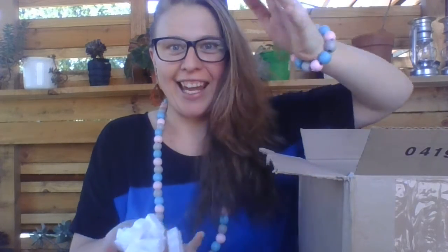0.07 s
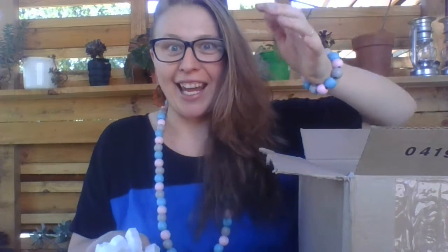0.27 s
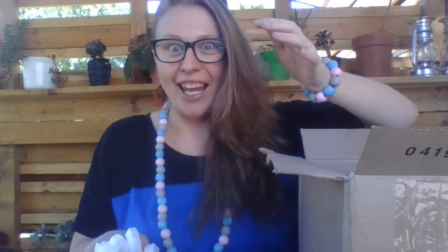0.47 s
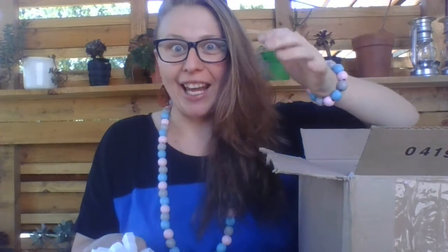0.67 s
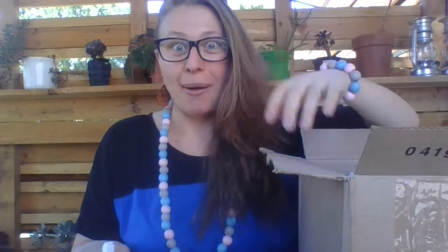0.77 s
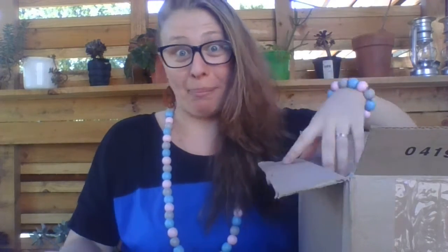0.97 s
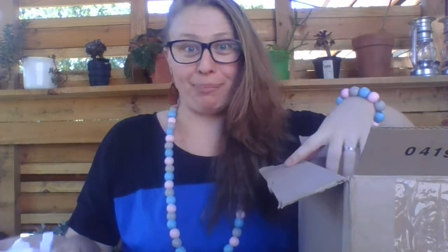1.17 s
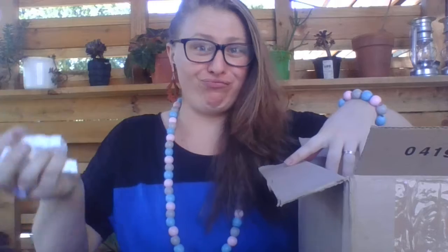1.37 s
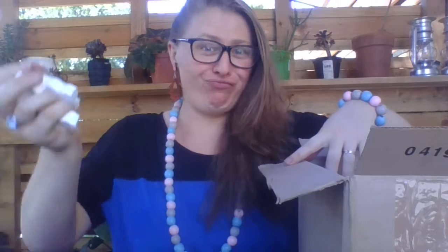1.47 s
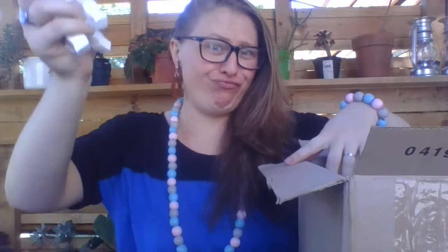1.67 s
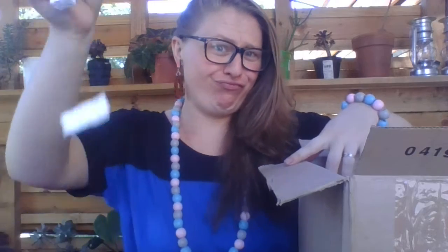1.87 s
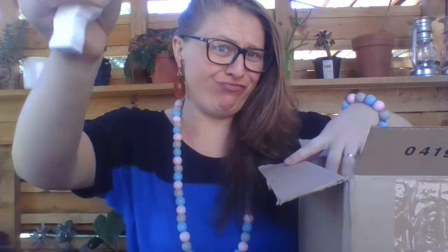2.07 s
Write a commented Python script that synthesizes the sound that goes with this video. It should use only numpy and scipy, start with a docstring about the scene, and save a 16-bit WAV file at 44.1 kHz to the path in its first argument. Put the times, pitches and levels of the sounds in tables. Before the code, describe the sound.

A hard, high-pitched tick of foam chips hitting a tabletop, pinging and skidding to rest, a faint brush on cardboard, then crisp snaps and rubbing of squeezed chips, recorded close on a quiet outdoor porch with short reflections.

```python
"""On a small wooden porch, foam packing chips drop onto a table close by, ping and bounce to rest.
Each landing is two noise puffs plus damped sines; noise grains make the skidding between bounces.
A hand bumps a cardboard box (booms, puffs, grains). Then a handful of chips is squeezed and lifted:
grains rub, short puffs snap and stick-slip pulses squeak. Below and behind lie a low rumble, quiet air,
a thin far twitter of swept narrow noise and, near the end, a faint steady tone."""
import sys
import numpy as np
from scipy import signal
from scipy.fft import rfft, irfft
from scipy.io import wavfile
from scipy.ndimage import uniform_filter1d

SR = 44100
rng = np.random.default_rng(int(sys.argv[2]) if len(sys.argv) > 2 else 0)


def log_audio(samples):
    """Write samples as a 16-bit WAV file to the path given in sys.argv[1]."""
    # one column per channel
    frames = np.atleast_2d(samples).T
    # limit to full scale, then quantise
    limited = np.clip(frames, -1, 1)
    pcm = np.round(limited * 32767).astype(np.int16)
    wavfile.write(sys.argv[1], SR, pcm)


N = 93492
T = np.arange(N) / SR  # time [s]
RING_N = SR // 5  # longest ring [samples]


def amp(db):
    """Decibels to gain."""
    return 10 ** (np.asarray(db) / 20)


def unit(x):
    """Scales to rms 1."""
    return x / np.sqrt(np.mean(x ** 2) + 1e-20)


def add(mix, s, sound):
    """Mixes a sound in at time s, cut off where the mix ends."""
    part = mix[max(round(s * SR), 0):][:len(sound)]
    part += sound[:len(part)]


def level(points):
    """Gain over time from (time [s], level [dB]) points."""
    return amp(np.interp(T, *np.transpose(points)))


def colour(x, points, size=8192):
    """Minimum-phase filter through (frequency [Hz], relative level [dB]); keeps the power of white noise."""
    hz, db = np.transpose(points)
    bins_hz = abs(np.fft.fftfreq(size, 1 / SR)) + 1
    gain = unit(amp(np.interp(np.log(bins_hz), np.log(hz), db)))
    spectrum = np.exp(np.conj(signal.hilbert(np.log(gain))))
    taps = np.fft.ifft(spectrum).real[:size // 2]
    return signal.fftconvolve(x, taps)[:len(x)]


def burst(decay_s, size=4096):
    """A dying puff of noise: its spectrum is flattened, then its end is faded further."""
    fall = np.exp(-np.minimum(T[:size] / decay_s, 20))
    z = rfft(rng.standard_normal(size) * fall)
    flat = irfft(z / (abs(z) + 1e-12), size)
    return unit(flat * np.sqrt(np.sqrt(fall))) * np.sqrt(np.mean(fall ** 2))


def puffs(rows, spectrum):
    """Short dying bursts that share one colour."""
    out = np.zeros(N)
    for s, db, decay_s in rows:
        add(out, s, amp(db) * burst(decay_s))
    return colour(out, spectrum)


def ring(modes, scale=1, blur=0):
    """Damped sines of a struck object; blur lets the strength and phase of each one wander."""
    blur_s = 0.0016  # how fast the wander changes
    t, out = T[:RING_N], 0
    for hz, db, t60 in modes:
        phase = 2 * np.pi * hz * scale * t
        wave = np.sin(phase)
        if blur:
            smoother = np.poly([np.exp(-1 / (blur_s * SR))] * 2)
            noise = rng.standard_normal((2, len(t)))
            strength, shift = unit(signal.lfilter([1], smoother, noise))
            wave = (1 + blur * strength) * np.sin(phase + blur * shift)
        out = out + amp(db) * np.exp(-np.log(1000) * t / t60) * wave
    return out


def resonate(x, hz, width_hz):
    """A steep resonance of gain 1 that follows hz: shift down, low-pass twice, shift back."""
    turn = np.exp(2j * np.pi * np.cumsum(hz * np.ones(len(x))) / SR)
    r = np.exp(-np.pi * width_hz / SR)
    low = signal.lfilter([(1 - r) ** 2], [1, -2 * r, r * r], x / turn)
    return 2 * (turn * low).real


def rubbing(curve, spectrum, spread_db):
    """Dense tiny slips of uneven size, evened out and then shaped by the level curve."""
    grains_per_s, grain_s = 2600, 0.0005  # average rate, decay
    sizes = amp(spread_db * np.minimum(rng.exponential(1, N), 4))
    slips = (rng.random(N) < grains_per_s / SR) * sizes
    envelope = signal.lfilter([1], [1, -np.exp(-1 / (grain_s * SR))], slips)
    grains = envelope * rng.standard_normal(N)
    running_rms = np.sqrt(abs(uniform_filter1d(grains ** 2, size=700)) + 1e-9)
    return colour(grains / running_rms * level(curve), spectrum)


def landings():
    """Each landing knocks, ticks and rings in its own mix; the table top rings with the knock."""
    # chips landing: (time [s], knock [dB], tick [dB], low ring pitch [Hz],
    # low ring [dB], middle ring [dB], high ring [dB])
    falls = [(.3107, -36.5, -26.5, 3300, -57, -29.5, -46), (.3167, -21.5, -32.5, 3195, -25.5, -2.5, -25),
             (.4499, -39, -29, 3400, -37, -21.5, -22.5), (.5121, -36, -39, 3455, -29.5, -30, -22.5),
             (.5358, -37.5, -38, 3580, -42, -22.5, -34.5), (.5565, -42, -63, 3455, -40.5, -48, -45),
             (.6103, -36, -58, 3260, -42.5, -46, -46.5), (.6250, -54.5, -65, 3260, -48, -62.5, -51),
             (.6452, -47, -55, 3300, -51.5, -62, -51.5), (.6920, -51.5, -63, 3480, -65, -48, -53),
             (.6985, -53.5, -66, 3440, -60.5, -41, -47), (.7268, -51.5, -66, 3348, -50.5, -49, -47.5),
             (.7362, -53, -62.5, 3350, -62, -62, -67), (.7590, -53, -73, 3350, -69, -61.5, -67),
             (.7735, -64, -76, 3385, -63, -70, -74), (.8185, -68.5, -60, 3350, -80, -66, -68),
             (.8255, -71, -63, 3350, -89, -62, -75)]
    # modes of a chip's low ring: (pitch ratio, level [dB], t60 [s])
    low_modes = [(1.0, 0, .065), (1.13, -6, .035), (.81, -8, .02), (1.205, -13, .065)]
    # modes of a chip's middle ring, high ring and of the table top: (frequency [Hz], level [dB], t60 [s])
    mid_modes = [(6067, 2, 0.011), (6430, -26.5, 0.0553), (5540, -12, 0.0081)]
    high_modes = [(7060, -2, 0.023), (7290, -5, .03), (8060, -12, .028)]
    top_modes = [(183, -28.5, 0.094), (206, -23, 0.035), (282, -30, 0.044), (468.7, -28, 0.12),
                 (678, -22, .06), (828, -19.5, 0.086), (970, -29, 0.12), (1427, -24.5, 0.21)]
    # spectra of the knock and the tick: (frequency [Hz], relative level [dB])
    knock_colour = [(100, -3.5), (200, 1.5), (300, -6), (400, -16), (600, -6.5), (900, -1.5), (1400, 4.5),
                    (1750, -0.5), (2600, 5), (4000, -12.5), (6000, -1), (9000, -30), (12000, -32.5)]
    tick_colour = [(500, -30), (2000, -23.5), (5000, -1.5), (8000, -4), (9300, -7.5), (10900, 8),
                   (12000, -10.5)]
    knock_s, tick_s = 0.0024, 0.0016  # decays
    rise_s, blur = 0.00051, 0.3  # onset of the rings, unsteady share of the chip rings

    knocks, ticks, rings = np.zeros((3, N))
    rise = 1 - np.exp(-(T[:RING_N] / rise_s) ** 2)
    top = ring(top_modes)
    for s, knock_db, tick_db, low_hz, low_db, mid_db, high_db in falls:
        add(knocks, s, amp(knock_db) * burst(knock_s))
        add(ticks, s, amp(tick_db) * burst(tick_s))
        ping = amp(low_db) * ring(low_modes, low_hz, blur)
        ping += amp(mid_db) * ring(mid_modes, 1, blur)
        ping += amp(high_db) * ring(high_modes, 1, blur)
        add(rings, s, rise * (ping + amp(knock_db) * top))
    return colour(knocks, knock_colour) + colour(ticks, tick_colour) + rings


def skidding():
    """Chips skid between bounces as a stream of very uneven grains."""
    # level of the skidding: (time [s], level [dB])
    skid_level = [(.29, -110), (.335, -49), (.39, -59), (.44, -66), (.465, -54), (.5, -63.5), (.55, -58.5),
                  (.6, -65), (.66, -72.5), (.71, -74.5), (.8, -76), (.88, -73.5), (.97, -100)]
    # its spectrum: (frequency [Hz], relative level [dB])
    skid_colour = [(300, -15.5), (1100, -5.5), (2200, -9), (3200, -12.5), (4000, 7), (5300, -1), (7600, 5),
                   (9200, -5), (10700, -6), (12000, -17)]
    return rubbing(skid_level, skid_colour, spread_db=5.0)


def handful():
    """Snaps and rubbing between the chips, coloured by the hollow of the lifted handful, and squeaks."""
    # a chip cracks or slips in the hand: (time [s], level [dB], decay [s])
    snaps = [(1.3215, -40, 0.0027), (1.3648, -35.5, 0.0019), (1.3775, -31, 0.0029), (1.3885, -40, 0.0018),
             (1.3979, -18, 0.00078), (1.4048, -30, 0.0014), (1.4444, -25.5, 0.00076), (1.4932, -40, 0.0015),
             (1.5735, -32, 0.002), (1.6000, -49.5, .0015), (1.6672, -46, .0008), (1.6899, -30.5, .001),
             (1.6938, -30, 0.0018), (1.7090, -47, 0.00084), (1.7383, -44, 0.0013), (1.7470, -35, 0.00041),
             (1.7803, -29, 0.0018), (1.7816, -26.5, 0.0015), (1.7843, -30, 0.0047), (1.7885, -30, 0.0013),
             (1.8250, -36.5, 0.0035), (1.8325, -36, 0.0022), (1.8445, -50, .001), (1.8575, -39, .001),
             (1.8655, -50, 0.0014), (1.8752, -39, 0.00088), (1.8925, -34.5, 0.0016), (1.8980, -35, 0.00075),
             (1.9225, -53, .001), (1.9370, -48, 0.0016), (1.9497, -30.5, 0.0007), (1.9603, -43, .001),
             (1.9685, -38, .0015), (1.9990, -58, 0.0017), (2.0325, -58, 0.00088), (2.0545, -54, 0.0065)]
    # level of the rubbing: (time [s], level [dB])
    rub_level = [(1.17, -110), (1.25, -78), (1.315, -60.5), (1.325, -47.5), (1.354, -49), (1.362, -38),
                 (1.38, -38.5), (1.402, -26), (1.412, -41.5), (1.43, -55.5), (1.455, -45.5), (1.48, -75),
                 (1.56, -71.5), (1.582, -57), (1.62, -81.5), (1.66, -58), (1.70, -53), (1.725, -55),
                 (1.765, -51.5), (1.787, -40), (1.812, -56.5), (1.85, -55.5), (1.885, -50), (1.903, -48.5),
                 (1.93, -58.5), (1.96, -44), (1.982, -59.5), (2.0, -50), (2.022, -70.5), (2.05, -59.5),
                 (2.08, -75), (2.12, -85.5)]
    # spectra of the snaps and of the rubbing foam: (frequency [Hz], relative level [dB])
    crack_colour = [(150, -24), (400, -18), (1000, -15), (2300, -1), (3200, -10.5), (5000, 2.5), (6500, 5),
                    (8200, 4.5), (10000, 1.5), (12000, -14)]
    foam_colour = [(150, -20), (400, -26), (700, -20.5), (1100, -9), (1700, -11.5), (2250, -9),
                   (3200, -9.5), (4200, -0.5), (5000, -0.5), (6300, -5), (8000, -3), (10000, -7.5),
                   (12000, -17.5)]
    # resonance of the hollow: (time [s], pitch [Hz], share of the crackle [dB])
    hollow = [(1.4, 2480, 2), (1.68, 2630, -15), (1.76, 2430, 12.5), (1.79, 2210, -14), (1.83, 2240, 9),
              (1.87, 2100, -22), (1.92, 2040, 8), (2.0, 2000, -14)]

    crackle = patchy(puffs(snaps, crack_colour) + rubbing(rub_level, foam_colour, spread_db=1.5))
    s, hz, db = np.transpose(hollow)
    hollow_sound = resonate(crackle, np.interp(T, s, hz), width_hz=510)
    return crackle + amp(np.interp(T, s, db)) * hollow_sound + squeaks()


def patchy(x, size=256):
    """Gives every moment of the crackle its own random peaks and dips, as different chips touch."""
    depth_db, patch_hz, patch_s = 4, 446, 0.0077  # strength, width and duration of a patch
    overlap = size * 3 // 4
    hz, t, z = signal.stft(x, SR, nperseg=size, noverlap=overlap)
    over_hz = np.fft.fftfreq(len(hz), hz[1])[:, None]
    over_s = np.fft.fftfreq(len(t), t[1])
    # Gaussian smoothing of a noise map across frequency and time
    smooth = np.exp(-(np.pi * over_hz * patch_hz) ** 2 / 2 - (np.pi * over_s * patch_s) ** 2 / 2)
    noise_map = np.fft.fft2(rng.standard_normal(z.shape))
    patches = unit(np.fft.ifft2(noise_map * smooth).real)
    gain = unit(amp(depth_db * np.clip(patches, -2, 2)))
    return signal.istft(z * gain, SR, nperseg=size, noverlap=overlap)[1][:N]


def squeaks():
    """Foam on foam: quick, nearly regular stick-slip pulses ring two resonances of a chip."""
    # squeaks: (time [s], length [s], slips per second [Hz], level [dB])
    calls = [(1.32, 0.016, 365, -37), (1.335, 0.013, 370, -48), (1.38, 0.015, 380, -45),
             (1.668, 0.012, 380, -55), (1.756, 0.031, 375, -55), (1.768, 0.018, 350, -46)]
    # resonances of a chip: (frequency [Hz], width [Hz], relative level [dB])
    chip_modes = [(4500, 320, -5), (5020, 200, 1)]
    jitter = 0.08  # random share of the slip rate
    out = np.zeros(N)
    for s, length, slip_hz, db in calls:
        t = np.arange(0, length, 1 / SR)
        wobble = 1 + jitter * rng.standard_normal(SR // 10)[:len(t)]
        turns = np.cumsum(slip_hz * wobble) / SR
        slips = np.diff(np.floor(turns), prepend=-1)  # one pulse at each whole turn
        voice = sum(amp(mode_db) * resonate(slips, hz, width) for hz, width, mode_db in chip_modes)
        swell = np.sin(np.pi * (t / length) ** 0.69) ** 2
        add(out, s, amp(db) * unit(voice * swell))
    return out


def box():
    """The hand brushes the cardboard in noise puffs, and its fingers slide on the flap in fine grains."""
    # brushes: (time [s], level [dB], decay [s])
    brushes = [(.983, -52, 0.0092), (1.008, -55.5, 0.02)]
    # level of the fingers sliding on the flap: (time [s], level [dB])
    slide_level = [(.96, -110), (.99, -77), (1.015, -56.5), (1.04, -60.5), (1.06, -67.5), (1.09, -68.5),
                   (1.15, -78), (1.3, -90.5)]
    # spectra of the brushes and of the slide: (frequency [Hz], relative level [dB])
    cardboard = [(100, 1.5), (250, 10.5), (450, -21.5), (950, 8.5), (1500, -6.5), (2300, -3), (4000, -18.5),
                 (11000, -12)]
    slide_colour = [(300, -2.5), (1100, 7.5), (2400, 5), (3400, -7), (3900, 7), (4500, -3.5), (5300, 9.5),
                    (6300, -7), (7400, 6.5), (9000, -7), (10300, 7.5), (12000, -14)]
    return puffs(brushes, cardboard) + rubbing(slide_level, slide_colour, spread_db=-1.5)


def table():
    """Soft blows on table and box boom as damped low modes, over a swelling and sinking noise rumble."""
    # blows: (time [s], level [dB])
    thumps = [(0.317, -71), (.378, -37), (0.51, -55), (0.997, -39.5), (1.02, -41)]
    # modes of the boom: (frequency [Hz], level [dB], t60 [s])
    boom_modes = [(88, -4, 0.17), (119, 1.5, .1), (205, -5.5, 0.075), (270, -14.5, 0.093)]
    # level of the rumble: (time [s], level [dB])
    rumble_level = [(0, -63), (.12, -79.5), (.19, -68.5), (.23, -60), (.29, -69), (.36, -45), (.44, -50.5),
                    (.53, -50), (.59, -62), (.67, -58), (.72, -64), (.95, -67), (1.08, -58.5), (1.2, -64),
                    (1.3, -62.5), (1.42, -49.5), (1.52, -60.5), (1.59, -57), (1.66, -59.5), (1.75, -57),
                    (1.9, -55.5), (1.98, -56), (2.12, -63)]
    # its spectrum: (frequency [Hz], relative level [dB])
    rumble_colour = [(20, -31.5), (45, -24.5), (65, -17.5), (88, 1.5), (102, -6.5), (118, 3.5), (150, -15),
                     (210, -17.5), (300, -24), (420, -41.5), (900, -29.5), (3000, -73)]
    boom_rise_s = 0.004

    out = level(rumble_level) * unit(colour(rng.standard_normal(N), rumble_colour))
    boom = ring(boom_modes) * (1 - np.exp(-T[:RING_N] / boom_rise_s))
    for s, db in thumps:
        add(out, s, amp(db) * boom)
    return out


def porch(x, t60, spectrum):
    """A diffuse tail of reflections: coloured, decaying noise of unit energy."""
    delay_s = 0.0023  # before the first reflection
    t = T[:SR]
    tail = rng.standard_normal(SR) * np.exp(-np.log(1000) * t / t60) * (t > delay_s)
    return signal.fftconvolve(x, colour(tail / np.linalg.norm(tail), spectrum))[:N]


def reflections(near):
    """A short, stronger tail and a long, weaker one answer the near sounds."""
    # spectra of the short and the long tail: (frequency [Hz], relative level [dB])
    room_colour = [(100, 10.5), (1000, 6), (3200, 2), (6000, -6), (11000, -2)]
    late_colour = [(100, 2.5), (500, 3.5), (1200, 9), (2500, -1.5), (4000, 1.5), (6000, -16.5),
                   (8000, -11.5), (11000, -16.5)]
    short = amp(-10.5) * porch(near, 0.15, room_colour)
    return short + amp(-26) * porch(near, 0.64, late_colour)


def outdoors():
    """Quiet air as steady noise, and a far twitter of thin rising chirps: noise in a gliding resonance."""
    # spectrum of the air: (frequency [Hz], relative level [dB])
    air_colour = [(30, -4), (200, 5), (400, -4), (1000, -7), (2100, -7.5), (3000, -11), (4500, -6),
                  (6500, -18.5), (11000, -21.5)]
    # chirps: (time [s], length [s], start pitch [Hz], end pitch [Hz], level [dB])
    twitter = [(0.107, 0.054, 3660, 4770, -72.5), (0.13, 0.071, 4600, 5060, -72.5),
               (.15, 0.07, 3670, 5070, -84.5), (0.182, 0.042, 4800, 5200, -76.5),
               (0.223, .03, 3980, 5260, -79), (0.826, 0.098, 4270, 4400, -81)]
    out = amp(-77.5) * colour(rng.standard_normal(N), air_colour)
    for s, length, start_hz, end_hz, db in twitter:
        n = round(length * SR)
        noise = rng.standard_normal(SR // 2)[:n]
        chirp = unit(resonate(noise, np.linspace(start_hz, end_hz, n), width_hz=630))
        add(out, s, amp(db) * np.hanning(n) * chirp)
    return out


def faint_tone():
    """A sine of constant pitch fades in near the end."""
    # level of the tone: (time [s], level [dB])
    tone_level = [(1.6, -100), (1.75, -74), (1.93, -77.5), (2.04, -73), (2.12, -80)]
    return level(tone_level) * np.sin(2 * np.pi * 516 * T)  # 516 Hz


def scene():
    """Chips, handful and box with their reflections, over table, outdoors and tone."""
    near = landings() + skidding() + handful() + box()
    return (near + reflections(near) + table() + outdoors() + faint_tone())[None]


def record(dry):
    """The recorder's low cut and its steep upper band limit."""
    low_cut_hz, edge_hz = 52, 11650
    cut = signal.sosfilt(signal.butter(2, low_cut_hz, "high", fs=SR, output="sos"), dry)
    band_limit = signal.firwin(161, edge_hz, window=("kaiser", 8), fs=SR)
    return signal.oaconvolve(cut, band_limit[None], "same")


dry = scene()
out = record(dry)
log_audio(out)
```